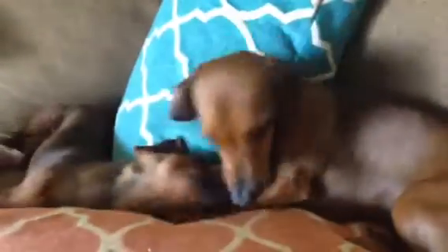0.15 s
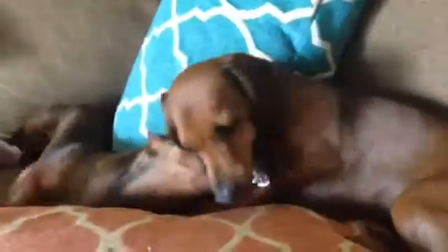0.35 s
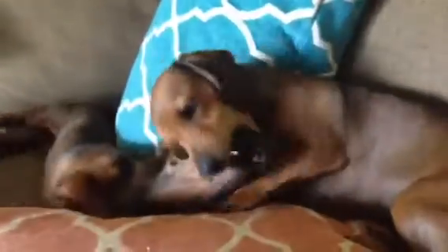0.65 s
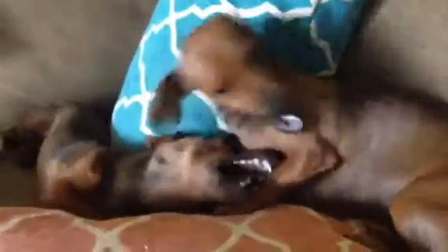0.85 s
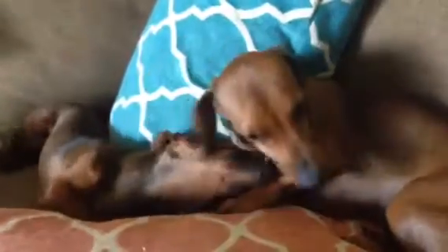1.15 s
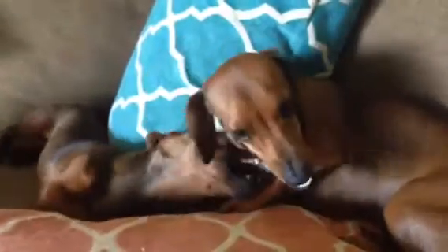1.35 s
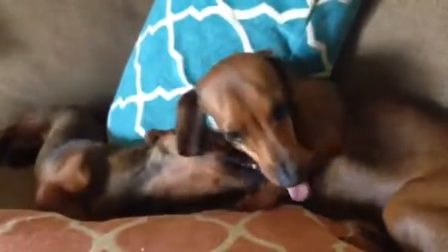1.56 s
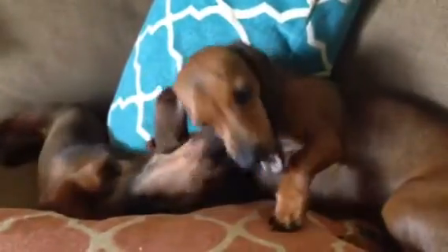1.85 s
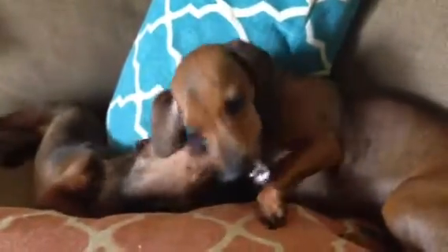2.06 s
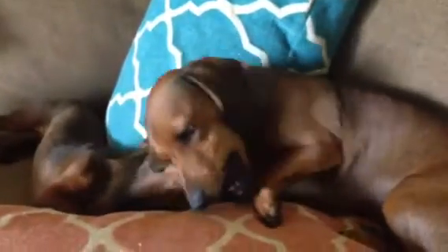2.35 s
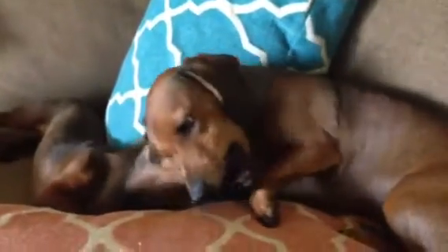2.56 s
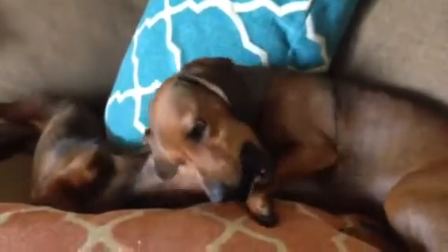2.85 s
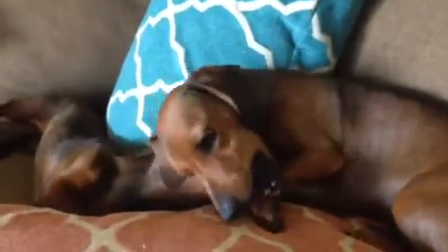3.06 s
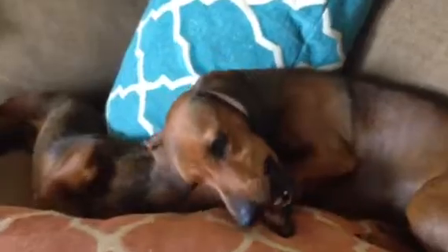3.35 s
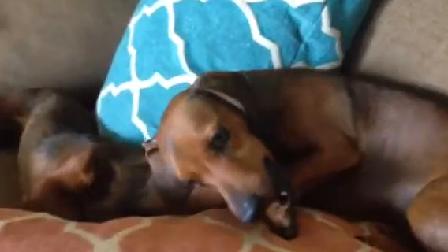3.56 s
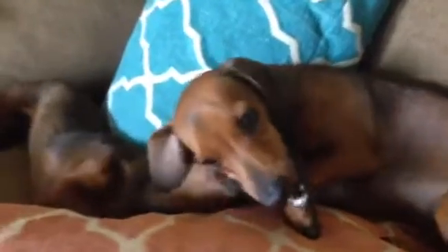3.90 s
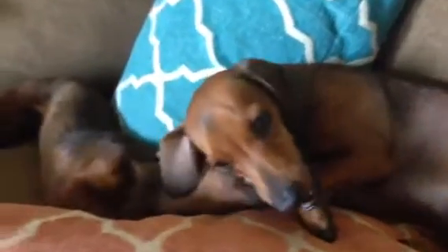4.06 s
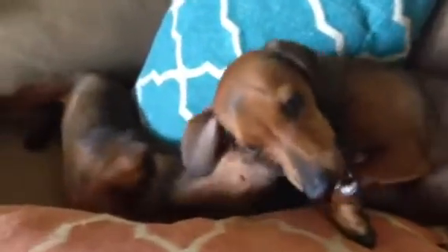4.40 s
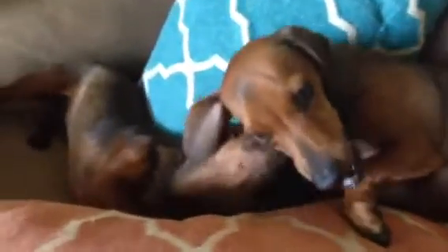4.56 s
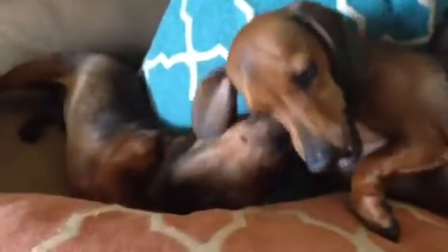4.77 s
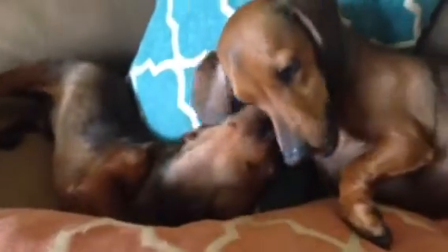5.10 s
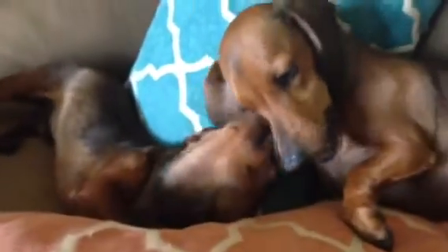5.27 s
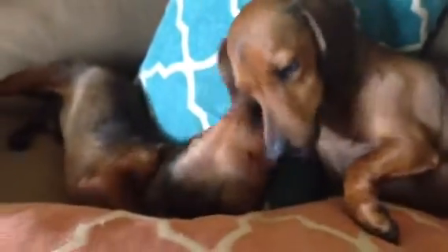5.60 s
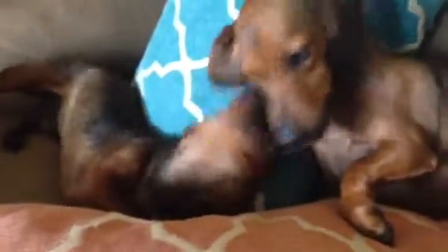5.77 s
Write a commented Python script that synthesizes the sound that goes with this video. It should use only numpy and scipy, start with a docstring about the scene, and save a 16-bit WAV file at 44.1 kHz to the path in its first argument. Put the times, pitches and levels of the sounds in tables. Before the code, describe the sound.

A small dog whines four times, high and clear, amid tiny wet jaw clicks, soft paw thumps and breathy snorts in a quiet room.

```python
"""Two small dogs wrestling on a sofa

Close to a phone's microphone, one dog whines four times, high and clear: partials of one gliding pitch.
Teeth and wet lips click (damped notes with bright cracks) and paws thump the cushions (low damped notes).
Breath, snorts and nasal wheezes are shaped noise. A faint soft echo follows the voice and knocks;
behind it all lie room rumble, hiss and mains hum."""
import sys
import numpy as np
from scipy import signal
from scipy.fft import rfft, irfft
from scipy.io import wavfile

SR = 44100
rng = np.random.default_rng(int(sys.argv[2]) if len(sys.argv) > 2 else 0)


def wav_record(signal):
    """Record a signal, one row per channel, as 16-bit PCM in the file named by sys.argv[1]."""
    frames = np.transpose(np.atleast_2d(signal))
    bounded = np.clip(frames, -1, 1)
    # unit amplitude maps onto the largest positive 16-bit level
    quanta = np.round(bounded * 32767).astype(np.int16)
    wavfile.write(sys.argv[1], SR, quanta)


N = 261954  # length [samples]

# The four whines, each a list of rows: (time [s], pitch [Hz], first partial [dB rms], second partial [dB rms],
# tongue resonance [Hz], its level [dB], mouth resonance [Hz], its level [dB]); levels before the wavering
WHINES = [
    [(0.61, 830, -38, -60, 2450, -53, 4470, -74), (0.626, 791, -43, -48.5, 2500, -73, 4180, -71),
     (0.668, 795, -41.5, -45.5, 2800, -66, 4150, -63), (0.7, 843, -39.5, -56, 3300, -74, 4250, -65),
     (0.735, 860, -39.5, -66, 3400, -72, 4275, -69), (0.78, 824, -41, -55.5, 2480, -69, 4400, -78),
     (0.822, 796, -43, -51.5, 2450, -72, 4360, -68), (0.855, 832, -44.5, -78, 3020, -82, 4300, -63),
     (0.885, 860, -40, -70, 3300, -74, 4300, -63), (0.925, 833, -41, -60.5, 2500, -72, 4250, -71),
     (1.0, 853, -37.5, -60.5, 3260, -65, 4250, -82), (1.055, 827, -39.5, -61.5, 2560, -64.5, 4150, -71),
     (1.192, 905, -34, -56.5, 3420, -60, 4500, -76), (1.21, 986, -35.5, -52.5, 3890, -65, 4870, -60),
     (1.24, 986, -37, -56, 3950, -68, 4930, -56), (1.255, 1047, -41.5, -73, 3950, -78, 5180, -75),
     (1.275, 1038, -64, -80, 3960, -87, 5200, -89), (1.33, 1104, -84, -87, 3980, -85, 5300, -90)],
    [(1.774, 949, -30.5, -71, 3740, -70, 4780, -63), (1.83, 1009, -35, -71, 3840, -53.5, 4950, -89),
     (1.856, 1005, -38, -74, 3180, -59, 5050, -80), (1.895, 950, -34, -70, 3460, -55, 4744, -57.5),
     (1.937, 884, -36, -67, 3300, -57, 4450, -64), (2.05, 885, -35, -73, 3150, -56.5, 4700, -62),
     (2.124, 908.6, -37, -65, 3400, -55, 4770, -57), (2.145, 954, -42.5, -73, 3600, -71, 4680, -74),
     (2.184, 968, -48, -91, 3610, -87, 4700, -83), (2.2, 964, -77, -87, 3600, -88, 4700, -78.5),
     (2.28, 980, -70, -87, 3600, -81, 4700, -79)],
    [(3.08, 829, -40, -67, 3340, -66, 4540, -68), (3.13, 874, -38, -72, 3360, -59.5, 4800, -75),
     (3.27, 854, -40, -84, 3060, -62, 4660, -73), (3.29, 838, -41.5, -82, 2950, -61, 4900, -66),
     (3.356, 838, -40, -90, 2880, -59.5, 4730, -61), (3.42, 800, -42.5, -80, 2570, -62.5, 4780, -61.5),
     (3.475, 767, -42, -72, 2370, -62, 4660, -56), (3.52, 685, -44, -52, 2560, -59.5, 3900, -57),
     (3.596, 676, -44, -61, 2080, -57, 3846, -58), (3.62, 629, -45.5, -46.5, 2280, -52, 3570, -53),
     (3.638, 645, -45, -57, 1950, -57, 3350, -59), (3.652, 650, -62, -66, 1950, -75, 3700, -72),
     (3.67, 667, -69, -72, 1950, -85, 3820, -71)],
    [(3.988, 620, -41.5, -42, 2000, -54, 4690, -53), (3.997, 573, -49.5, -40, 2000, -50, 4660, -68),
     (4.012, 584.5, -47, -36.5, 2030, -47, 3080, -54), (4.044, 637, -41, -36, 2170, -45, 3150, -51),
     (4.085, 653, -41, -38, 2360, -51, 3380, -54.5), (4.155, 686, -40.5, -39.5, 2750, -63.5, 3730, -65),
     (4.178, 662, -40.5, -40, 2660, -54.5, 3440, -69), (4.195, 686, -40, -42, 2030, -54.5, 3440, -67),
     (4.24, 704.5, -40, -49, 2060, -52, 3470, -71), (4.28, 687, -40, -41.5, 2030, -53.5, 3400, -66),
     (4.376, 724.5, -40.5, -51.5, 2250, -49, 4940, -73), (4.4, 702.4, -39, -57, 2150, -53.5, 4600, -65),
     (4.46, 735, -41.5, -57, 2300, -50.5, 4000, -72), (4.485, 780, -42, -68, 2555, -51, 3900, -82),
     (4.546, 790, -39.5, -64, 2460, -49.5, 4390, -75), (4.578, 755.5, -39, -58.5, 2273, -57, 3940, -76),
     (4.66, 763.5, -39.5, -61, 2300, -55, 4185, -65.5), (4.75, 768, -43.5, -63.5, 2320, -56.5, 4350, -66.5),
     (4.82, 780, -44, -63, 2345, -61.5, 4380, -67), (4.85, 771, -44, -66, 2393, -66, 4450, -65),
     (4.98, 743, -45, -66, 2274, -70.5, 4400, -71), (5.1, 701.6, -46.5, -73, 2100, -69.5, 4880, -64),
     (5.125, 686, -49.5, -57.5, 2124, -73, 4840, -68), (5.18, 684, -50, -67, 2180, -70, 4930, -66.5),
     (5.262, 660, -51.5, -46.5, 2665, -67, 4370, -69.5), (5.303, 677, -49.5, -51.5, 2727, -66, 3950, -80),
     (5.375, 608.6, -61.5, -51, 2430, -73, 3520, -79), (5.445, 607.7, -67, -49, 2420, -72.5, 4000, -80),
     (5.5, 583.6, -53.5, -45, 2350, -74, 4265, -80), (5.548, 601.6, -62, -41.5, 2388, -74, 4170, -75),
     (5.645, 584.5, -59, -45.5, 2350, -71, 3564, -83), (5.675, 627, -64, -63, 2500, -82, 3296, -75),
     (5.795, 650, -70.5, -68, 2540, -82, 4300, -78)],
]
# Faint lead-in of each whine, which snaps up to its first row: (length [s])
LEAD_INS = [.01, .024, .02, .012]
# Spells in which a small cavity under the tongue, behind the teeth or in the nose rings the high partials:
# (time [s], length [s], level at mid-spell [dB], resonance [Hz])
CAVITY_RINGS = [(0.614, 0.11, -67, 8600), (0.764, 0.12, -66.5, 6400), (0.915, 0.11, -72.5, 5900),
                (0.967, 0.33, -63.5, 8360), (1.76, 0.032, -64, 5800), (1.87, 0.07, -68.5, 8400),
                (1.866, 0.045, -72, 5800), (2.0, 0.16, -70, 5800), (3.48, .06, -70, 5600),
                (4.008, 0.57, -68.5, 6040), (4.458, 0.29, -72.5, 8600), (4.545, .12, -50.5, 3000),
                (5.36, 0.26, -81, 8300)]
# Teeth and lips: (time [s], peak of the ring's envelope [dB], ring [Hz], t60 [s], crack before its filter [dB])
CLICKS = [(0.4304, -35, 1760, 0.0057, -59), (0.467, -42.5, 1110, 0.0031, -58),
          (.6135, -44, 4400, .0025, -35.5), (0.7175, -33, 3560, 0.0042, -28),
          (0.7188, -41, 4500, 0.0091, -50), (0.853, -40.5, 5540, .0031, -34),
          (0.8936, -39.5, 1520, .0027, -60), (1.4318, -41, 1520, 0.0048, -55),
          (1.6530, -39.5, 3560, 0.0042, -37.5), (2.0944, -41.5, 1940, 0.0015, -60),
          (2.2329, -49, 2803, .003, -54), (2.7560, -48.5, 1360, 0.013, -56), (2.7741, -39, 1630, .009, -63),
          (2.786, -56, 1950, 0.054, -70), (2.8285, -55, 6000, .0053, -42), (3.131, -35, 1570, 0.0037, -54),
          (3.416, -42.5, 1810, 0.0052, -60), (3.4227, -43, 4520, .0046, -41),
          (3.4421, -41.5, 1590, .0052, -60), (3.4550, -41, 1700, 0.0037, -59),
          (3.622, -64, 7050, .005, -45), (3.702, -55, 3200, 0.014, -70), (3.9099, -45, 1390, .02, -50),
          (3.9422, -39, 1590, 0.0048, -62), (4.54, -40, 1760, 0.0047, -60),
          (4.901, -51.5, 2400, 0.014, -70), (5.31, -34.5, 1690, 0.0019, -60),
          (5.4750, -53.5, 1920, 0.0083, -70), (5.656, -51, 8000, 0.0025, -56)]
# Paws and bodies on the cushions: (time [s], peak of the envelope [dB], pitch [Hz], t60 [s])
THUMPS = [(0.02, -44, 237, 0.018), (0.435, -47.5, 340, 0.022), (0.467, -42, 300, 0.0044),
          (1.712, -44, 153, 0.033), (1.722, -46.5, 382, 0.016), (2.083, -39.5, 190, 0.03),
          (5.8090, -41, 264, 0.013)]
# Breath of both dogs: (time [s], effort [dB])
BREATH = [(0.0, -69.5), (0.38, -74.5), (0.63, -66.5), (0.74, -58.5), (0.82, -69), (1.02, -68), (1.2, -63),
          (1.5, -70.5), (1.82, -67), (2.22, -70), (3.3, -71.5), (3.6, -68), (3.72, -70), (3.97, -73),
          (4.1, -64.5), (4.57, -67.5), (5.08, -72), (5.94, -70.5)]
# Resonances of the breath in mouth, teeth and nose: (centre [Hz], width [Hz], relative level [dB])
MOUTH_AIR = [(2170, 2300, 4.5), (3510, 590, -1.5), (4660, 1500, 4.5)]
TEETH_AIR = [(6360, 2800, 0)]
NOSE_AIR = [(8520, 1400, -0.5), (9900, 1900, -5.5)]
# How teeth and nose follow the mouth's effort: (level at rest [dB], share of the swell [0-1])
TEETH_FOLLOW = (-77.5, 1)
NOSE_FOLLOW = (-79, 1)
# Snorts and gasps: (time [s], length [s], level before the swell [dB], centre [Hz], width [Hz])
PUFFS = [(0.0, 0.026, -60.5, 3050, 4000), (0.583, 0.064, -62.5, 3800, 2500), (1.22, 0.042, -61, 2993, 3000),
         (1.793, 0.12, -64.5, 1720, 1800), (3.053, 0.13, -67, 8800, 3000), (3.065, 0.1, -62, 3500, 3500),
         (3.604, 0.061, -58.5, 4070, 2000), (3.634, 0.055, -60, 1380, 1800), (3.94, 0.05, -65, 3970, 3000),
         (3.977, 0.031, -57, 4160, 2490), (4.325, 0.12, -65, 2560, 1180), (5.691, 0.21, -63, 3640, 2270),
         (5.714, 0.14, -62.5, 5000, 916), (5.723, 0.13, -69.5, 8840, 2523)]
# Thin wheezes of the nose, and a short narrow hiss near 5.2 kHz as the fourth whine sets in: (time [s], length
# [s], level before the swell [dB], start [Hz], end [Hz], width [Hz])
WHEEZES = [(.620, 0.21, -73, 8700, 8870, 400), (1.264, 0.46, -72, 8970, 8800, 498),
           (1.271, 0.13, -77, 2150, 2470, 150), (1.295, 0.3, -71, 6130, 5650, 596),
           (1.565, 0.11, -71, 4280, 4330, 216), (2.19, 0.56, -75.5, 4780, 4630, 540),
           (3.983, 0.044, -60, 5220, 5300, 300), (4.345, 0.11, -76, 4520, 4250, 601),
           (5.366, 0.12, -74, 7950, 7900, 540)]
# Spectrum of the room and microphone noise: (frequency [Hz], relative density [dB per Hz])
ROOM_TONE = [(12, -37), (20, -18.5), (129, -1.5), (207, -5), (238, -7.5), (265, -8.5), (360, -7),
             (562, -15.5), (764, -18.5), (830, -18.5), (1410, -24), (1860, -32), (2740, -53), (3330, -29),
             (15400, -26.5)]
# Mains buzz: (frequency [Hz], level before the waver [dB rms])
HUM = [(120, -71.5), (240, -68), (360, -80.5)]

MOUTH_WIDTH_HZ, MOUTH_SKIRT_DB = 360, 2
TONGUE_WIDTH_HZ, TONGUE_SKIRT_DB = 650, -10.5
RING_WIDTH_HZ = 590
ATTACK_DB, ATTACK_SNAP, RELEASE_S = -34, 0.8, .012  # snap: exponent of the lead-in's curve
FLUTTER_DB = 1.8  # rms, at the sixth partial
FAINT_DB, FAINT_SHIMMER_PER_DB = -51.5, 0.3979  # a faint voice breaks up
BREATH_REST_DB = -69.5
ECHO_DB, ECHO_T60_S = -30, .25
ROOM_DB = -62.5
EDGE_HZ = 15430  # upper band limit of the phone


def whine(rows, lead_s, jitter=0.00321, shimmer_db=0.67, rasp_db=2.0, tilt_db=2.5, waver_db=1.5):
    """Clean partials on one pitch; the high ones are loud only near tongue, mouth, teeth and nose resonances."""
    start, end = rows[0][0], rows[-1][0]
    t = np.arange(start - lead_s, end + RELEASE_S, 1 / SR)
    hz, first, second, tongue_hz, tongue_db, mouth_hz, mouth_db = follow(rows, t)
    unsteady_pitch = 1 + jitter * wander(len(t), 60) + 0.00413 * wander(len(t), 28.0)
    phase = 2 * np.pi * np.cumsum(hz * unsteady_pitch) / SR

    order = np.arange(3, 15)[:, None]
    partial_hz = order * hz
    mouth = hump(partial_hz, mouth_hz, MOUTH_WIDTH_HZ)
    mouth = mouth + amp(MOUTH_SKIRT_DB) * hump(partial_hz, 2160, 2300) ** 2
    mouth = mouth * amp(tilt_db * order) * (order > 4)  # favours the upper partials, from the fifth on
    high = amp(mouth_db) * mouth / np.sqrt((mouth ** 2).sum(0))
    high = high + amp(tongue_db) * hump(partial_hz, tongue_hz, TONGUE_WIDTH_HZ) ** 2
    high = high + amp(tongue_db + TONGUE_SKIRT_DB) * hump(partial_hz, tongue_hz, 2600) ** 2
    for s, length, db, ring_hz in CAVITY_RINGS:
        spell = np.sin(np.pi * np.clip((t - s) / length, 0, 1))
        high = high + amp(db) * spell * hump(partial_hz, ring_hz, RING_WIDTH_HZ)

    # weak partials come and go slowly, and rasp, the higher the more, as the folds close unevenly
    roughness_db = [k / 6 * (FLUTTER_DB * wander(len(t), 19.0) + rasp_db * wander(len(t), 360)) for k in order]
    high = high * amp(roughness_db)
    low = amp([first, second + waver_db * wander(len(t), 23)])
    unsteady = 1 + FAINT_SHIMMER_PER_DB * np.maximum(FAINT_DB - np.maximum(first, second), 0)
    level = np.vstack([low, high]) * amp(shimmer_db * unsteady * wander(len(t), 30.0))

    every = np.arange(1, 15)[:, None]
    start_phase = rng.uniform(0, 2 * np.pi, every.shape)
    voice = np.sqrt(2) * (level * np.sin(every * phase + start_phase)).sum(0)
    lead_in = amp(ATTACK_DB * np.clip((start - t) / lead_s, 0, 1) ** ATTACK_SNAP)
    release = np.clip(1 - (t - end) / RELEASE_S, 0, 1)
    return t[0], voice * lead_in * release


def clicks(crack_t60=0.0066):
    """Teeth and wet lips ring the mouth as a damped note and add a bright crack of decaying noise."""
    out, t = np.zeros(N), np.arange(400) / SR
    cracks = rng.standard_normal((len(CLICKS), len(t))) / 2 * amp(-60 * t / crack_t60)
    cracks = signal.sosfilt(signal.butter(1, (2500, 8000), "band", fs=SR, output="sos"), cracks)
    for (s, peak_db, hz, t60, crack_db), crack in zip(CLICKS, cracks):
        add(out, s, knock(peak_db, hz, t60, rise=0.019))
        add(out, s, amp(crack_db) * crack)
    return out


def thumps():
    """Paws and bodies push the cushions, each blow one low damped note."""
    out = np.zeros(N)
    for s, *blow in THUMPS:
        add(out, s, knock(*blow, rise=0.046))
    return out


def knock(peak_db, hz, t60, rise):
    """One damped note after a soft start; rise is a share of its decay time."""
    t = np.arange(round(t60 * SR)) / SR
    shape = amp(-60 * t / t60) * (1 - np.exp(-t / (rise * t60))) ** 2
    return -amp(peak_db) * shape / shape.max() * np.sin(2 * np.pi * hz * t)


def breath(gust_db=2.0):
    """Turbulent air in three cavities; teeth and nose follow the mouth's effort at their own levels."""
    mouth_db, = follow(BREATH, np.arange(N) / SR)
    efforts = [mouth_db]
    for rest_db, share in (TEETH_FOLLOW, NOSE_FOLLOW):
        efforts.append(rest_db + share * (mouth_db - BREATH_REST_DB))
    out = np.zeros(N)
    for effort_db, cavity in zip(efforts, (MOUTH_AIR, TEETH_AIR, NOSE_AIR)):
        air = coloured(lambda f: sum(amp(db) * hump(f, hz, width) for hz, width, db in cavity))
        out = out + amp(effort_db + gust_db * wander(N, 17)) * air
    return out


def puffs(grain_db=1.0):
    """Snorts and gasps: short rushes of resonant air noise that swell and fade."""
    out = np.zeros(N)
    for s, length, db, hz, width in PUFFS:
        swell = signal.windows.tukey(round(length * SR), .8)
        swell = swell * amp(grain_db * wander(len(swell), 96))  # the air splutters
        air = coloured(lambda f: hump(f, hz, width))[:len(swell)]
        add(out, s, amp(db) * swell * air)
    return out


def wheezes():
    """Narrow bands of air noise, mostly from the nose, whose centre glides."""
    out = np.zeros(N)
    for s, length, db, start_hz, end_hz, width in WHEEZES:
        swell = signal.windows.tukey(round(length * SR), .5)
        phase = 2 * np.pi * np.cumsum(np.linspace(start_hz, end_hz, len(swell))) / SR
        # two independent noises on a cosine and a sine make a band around the gliding centre
        fuzz = wander(len(swell), width / 2) * np.cos(phase) + wander(len(swell), width / 2) * np.sin(phase)
        add(out, s, amp(db) * swell * fuzz)
    return out


def echo(x):
    """A short, soft tail from the cushions and walls, dull in the treble."""
    t = np.arange(SR // 2) / SR
    tail = rng.standard_normal(len(t)) * amp(-60 * t / ECHO_T60_S) * (t > .004)
    tail = signal.lfilter([1], [1, -.6], tail)
    return signal.fftconvolve(x, tail / np.linalg.norm(tail))[:N]


def room_tone(swell_db=2.0, waver_db=0.24):
    """Rumble and microphone hiss as shaped noise, with a wavering mains buzz of sines."""
    f, db = np.transpose(ROOM_TONE)
    bed = coloured(lambda hz: amp(np.interp(np.log(hz + 1), np.log(f + 1), db)))
    rumble = signal.sosfilt(signal.butter(2, 500, fs=SR, output="sos"), bed)
    bed = bed + rumble * (amp(swell_db * wander(N, 36)) - 1)  # the low end is lumpy
    t = np.arange(N) / SR
    buzz = sum(amp(db + waver_db * wander(N, 4.7)) * np.sin(2 * np.pi * hz * t) for hz, db in HUM)
    return amp(ROOM_DB) * bed + np.sqrt(2) * buzz


def amp(db):
    """Amplitude of a level in dB."""
    return 10 ** (np.asarray(db) / 20)


def evened(x):
    """The signal scaled to rms 1."""
    return x / np.sqrt(np.mean(x ** 2) + 1e-20)


def add(mix, s, sound):
    """Lay a sound into the mix at a time in seconds, cut at the mix's end."""
    part = mix[round(s * SR):][:len(sound)]
    part += sound[:len(part)]


def wander(count, hz):
    """Random drift of rms 1, up to about hz."""
    return evened(signal.sosfilt(signal.butter(2, hz, fs=SR, output="sos"), rng.standard_normal(count)))


def hump(f, hz, width_hz):
    """Gain of a resonance: 1 at its centre, a half at half its width away."""
    return 1 / (1 + (2 * (f - hz) / width_hz) ** 2)


def coloured(gain):
    """Noise of rms 1 with the spectrum gain(Hz)."""
    return evened(irfft(rfft(rng.standard_normal(N)) * gain(np.fft.rfftfreq(N, 1 / SR)), N))


def follow(rows, t):
    """The columns of a table, joined by straight lines in time."""
    s, *columns = np.transpose(rows)
    return [np.interp(t, s, c) for c in columns]


def scene():
    """The dogs close by, their faint echo, their breath and the room behind."""
    dogs = clicks() + thumps()
    for rows, lead_s in zip(WHINES, LEAD_INS):
        add(dogs, *whine(rows, lead_s))
    air = breath() + puffs() + wheezes()
    return (dogs + amp(ECHO_DB) * echo(dogs) + air + room_tone())[None]


def record(dry):
    """The microphone drops the deepest bass; then comes the band limit of the phone."""
    thin = signal.sosfilt(signal.butter(2, 32, "high", fs=SR, output="sos"), dry)
    band_limit = signal.firwin(1023, EDGE_HZ, window=("kaiser", 10), fs=SR)
    return signal.oaconvolve(thin, band_limit[None], "same")


dry = scene()
out = record(dry)
wav_record(out)
```